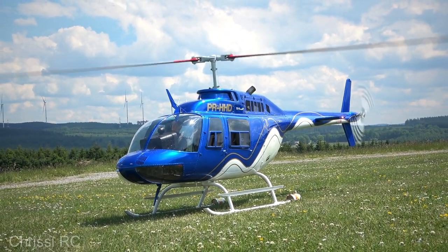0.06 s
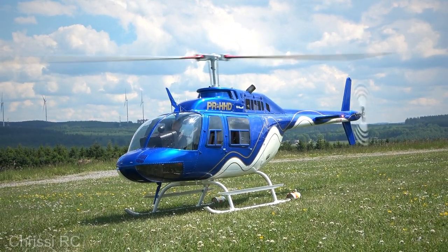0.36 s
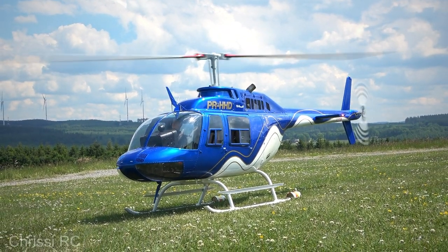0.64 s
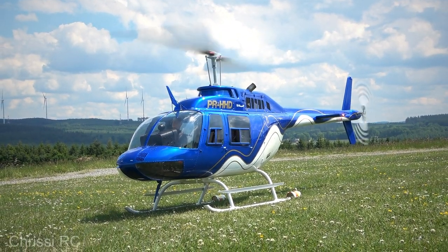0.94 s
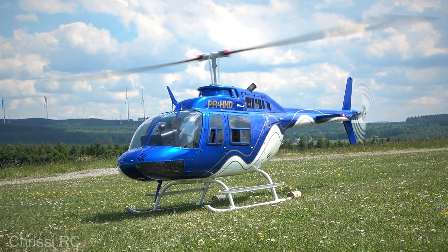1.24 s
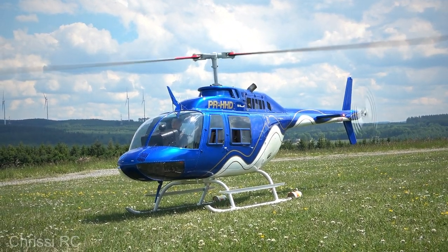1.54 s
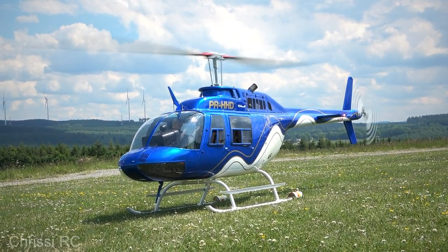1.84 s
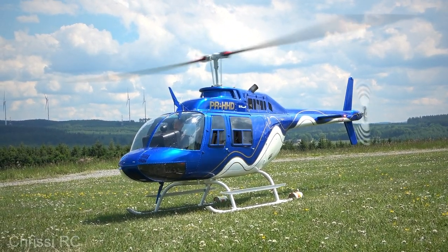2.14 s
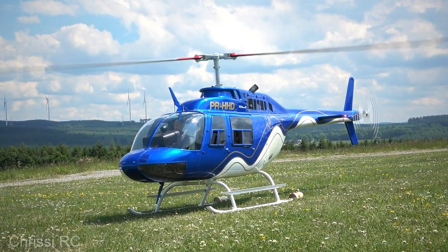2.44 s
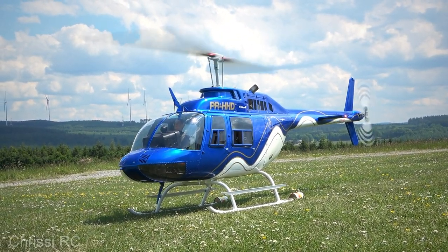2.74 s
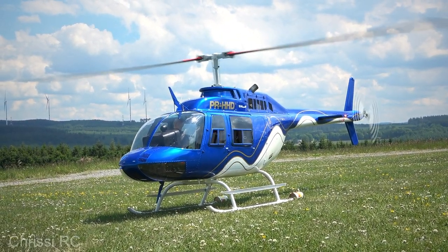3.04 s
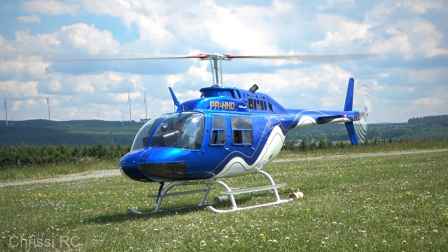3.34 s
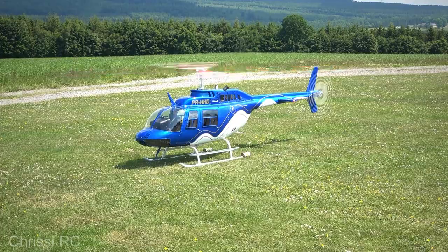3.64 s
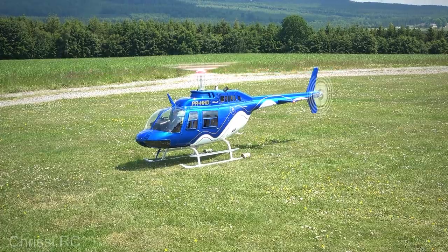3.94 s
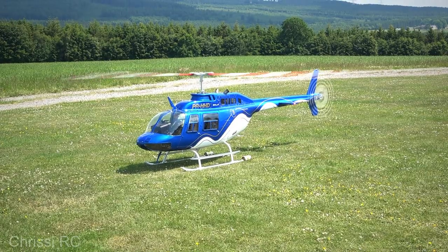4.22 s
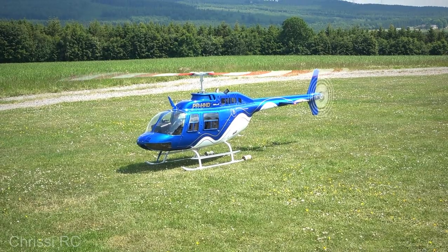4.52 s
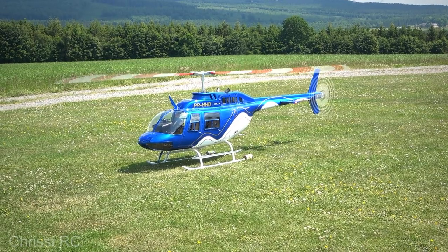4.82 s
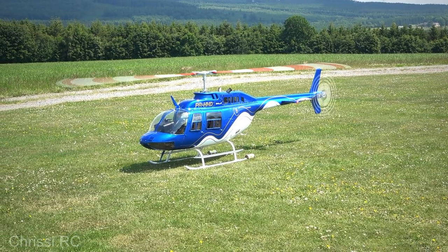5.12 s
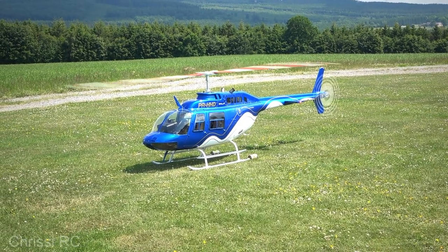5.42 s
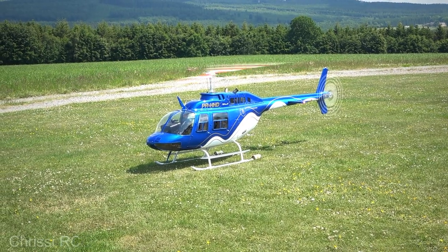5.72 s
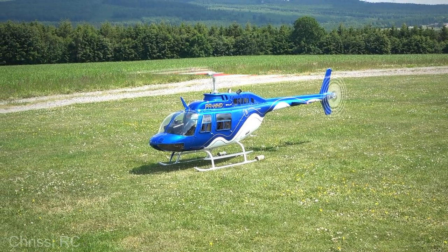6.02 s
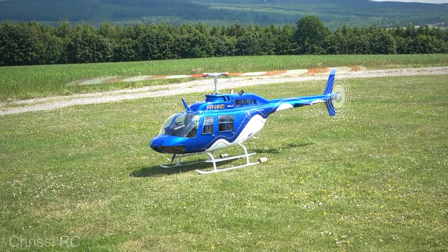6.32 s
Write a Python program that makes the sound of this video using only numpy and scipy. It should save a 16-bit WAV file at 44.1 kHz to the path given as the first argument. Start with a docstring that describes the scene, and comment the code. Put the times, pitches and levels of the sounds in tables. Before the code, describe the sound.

From the start, a model helicopter's turbine runs close to the microphone on open grass. A piercing, very high whine climbs slowly over a steady jet roar and hiss. Thinner whistles swell and fade beside it, with a low fuselage drone and faint gear tones underneath. The rotor adds only a barely noticeable pulse.

At about 3.6 seconds the sound switches abruptly to a position farther off, with the turbine running slower. A hollow, wavering, mid-pitched exhaust howl now leads over the rush, surging slightly around 3.7, 4.9 and 6 seconds. The whine is lower and much weaker, coming and going as it keeps rising gently until the end, at about 6.4 seconds.

Light wind rumbles on the microphone throughout, with soft gusts in the first second and again from about 4.8 seconds.

```python
"""A piercing compressor whine, close to the microphone: a model turbine helicopter spools up on open grass.
Under the whine lie the jet's combustion roar and hiss, a fuselage drone and faint gear tones.
After about 3.6 s we stand abruptly farther off, the turbine at a lower speed, and the resonating
exhaust pipe howls near 900 Hz. Wind nudges the microphone in both positions. Mono."""
import sys
import numpy as np
from scipy import signal
from scipy.fft import rfft, irfft, next_fast_len
from scipy.io import wavfile
from scipy.ndimage import uniform_filter1d

SR = 44100
rng = np.random.default_rng(int(sys.argv[2]) if len(sys.argv) > 2 else 0)


def wav_out(sig):
    """Save sig, one row per channel (or a flat mono array), as 16-bit PCM at SR to the path in sys.argv[1]."""
    wavfile.write(sys.argv[1], SR, np.round(np.clip(np.atleast_2d(sig).T, -1, 1) * 32767).astype(np.int16))


N = 280917
TIME = np.arange(N) / SR
FAR_START_S = 3.576
# cycles per turn of the turbine shaft
COMPRESSOR_ORDER, GEAR_RATIO, TAIL_RATIO, ROTOR_RATIO = 12, 0.1955, 0.0798, 0.01395

# compressor whine at each position: (time [s], pitch [Hz])
NEAR_WHINE_PITCH = [(0.0, 11979), (0.15, 12007), (0.5, 12108), (1.0, 12214), (1.5, 12309), (2.0, 12405),
                    (2.5, 12488), (3.0, 12569), (3.57, 12684)]
FAR_WHINE_PITCH = [(3.58, 8475), (4.0, 8543), (4.5, 8639), (5.0, 8734), (5.5, 8835), (6.0, 8944),
                   (6.37, 9034)]
# compressor whine at the microphone: (time [s], level [dB])
NEAR_WHINE_LEVEL = [(0.0, -20), (0.17, -18), (0.68, -22.6), (0.86, -19.5), (1.15, -19.8), (1.65, -17),
                    (2.66, -17), (2.82, -21.3), (3.57, -23)]
FAR_WHINE_LEVEL = [(3.58, -33), (3.85, -29), (4.0, -37), (4.32, -29), (4.58, -30), (5.08, -43), (5.24, -32),
                   (6.0, -36), (6.37, -35)]
# close whistles at 6 and 14 times the shaft rate: (time [s], level [dB])
WHISTLE_6_LEVEL = [(0.0, -30.5), (0.15, -35), (0.36, -43), (0.56, -28.3), (0.88, -30), (1.2, -34.5),
                   (1.9, -37), (3.0, -30.6), (3.57, -42)]
WHISTLE_14_LEVEL = [(0.0, -49), (0.37, -35.8), (0.53, -44), (1.02, -33.5), (1.28, -50), (1.9, -57)]
# surges of the exhaust howl: (start [s], hold [s], lift [dB])
HOWL_SURGES = [(3.71, 0.16, 2.5), (4.854, 0.071, 3), (6.02, 0.04, 1.5)]
# combustion roar: (frequency [Hz], relative density [dB])
NEAR_ROAR_SPECTRUM = [(55, -17), (88, -5.5), (125, -4.5), (220, -7), (280, -4.5), (350, -6.5), (620, -2),
                      (740, -4.5), (820, 1), (1080, -2), (1330, 0), (1450, -2.5), (1680, -1.5), (2750, -10)]
FAR_ROAR_SPECTRUM = [(65, -16), (115, -6.5), (160, -2), (220, -9.5), (350, -7.5), (470, -7), (600, -3.5),
                     (800, 8), (1130, 6), (1380, 2), (1620, -5.5), (2000, 0), (2300, -1), (2850, -10.5)]
# jet hiss: (frequency [Hz], relative density [dB])
NEAR_HISS_SPECTRUM = [(2850, -8.5), (3400, -4), (4000, -2.5), (4400, -7.5), (5200, -4), (6200, -4),
                      (7400, -8), (8800, 0), (9650, -9.5), (10700, -14), (12100, -3.5), (12900, -2.5),
                      (14400, -16.5), (15700, -14)]
FAR_HISS_SPECTRUM = [(2700, -9), (3050, -1.5), (3600, -0.5), (4350, -6.5), (5000, -1), (6300, -5.5),
                     (6900, -9), (8600, -3.5), (9400, -9), (10700, -12.5), (12500, -8.5), (14400, -9),
                     (15700, -14)]
# strength of the jet close up: (time [s], lift [dB])
NEAR_JET_LIFT = [(0.0, 0), (1.3, 1), (1.75, -0.5), (2.9, -1.4), (3.57, 0.5)]
# turbine shaft tones: (multiple of its rate, level [dB])
NEAR_SHAFT_TONES = [(2, -39), (9, -55), (10, -48), (11, -54)]
FAR_SHAFT_TONES = [(6, -58.5), (8, -65), (10, -52)]
# reduction gear tones: (multiple of its rate, level [dB])
NEAR_GEAR_TONES = [(2, -46.5), (8, -41.5), (15, -48), (16, -56), (19, -49), (20, -50.5)]
FAR_GEAR_TONES = [(2, -42), (4, -45.5), (18, -43.5), (20, -48.5), (22, -52.5), (26, -49), (30, -54),
                  (40, -52)]
# tail drive tones: (multiple of its rate, level [dB])
NEAR_TAIL_TONES = [(2, -46), (7, -40), (21, -40.5), (22, -42)]
# wind on the microphone: (frequency [Hz], relative density [dB])
WIND_SPECTRUM = [(8, -4), (14, 5), (22, -5), (32, -5.5), (48, -17), (80, -18), (200, -45)]
# gusts on the microphone: (start [s], hold [s], level [dB])
WIND_GUSTS = [(0.18, 0.12, -38), (0.547, 0.55, -38), (3.72, 0.091, -40), (4.8, 0.6, -34.5),
              (5.49, 0.06, -29), (5.88, 0.38, -34)]


def near_helicopter():
    """Microphone beside the machine: the whine stands out of the jet noise; the hollow fuselage drones."""
    shaft = shaft_angle(NEAR_WHINE_PITCH, hunting=0.00033)
    jet_db, = curves(NEAR_JET_LIFT)
    roar = from_db(-20 + jet_db + 0.35 * drift(6.7)) * coloured_noise(NEAR_ROAR_SPECTRUM)
    hiss = from_db(-24 + 0.71 * jet_db) * coloured_noise(NEAR_HISS_SPECTRUM)
    fuselage = from_db(-36) * cavity_noise(centre_hz=178.6, width_hz=40, lumpiness=0.25)
    compressor = whine(COMPRESSOR_ORDER * shaft, NEAR_WHINE_LEVEL,
                       flutter_db=0.72, fading_db=0.5, scatter=0.065, scatter_hz=110)
    whistles = whine(6 * shaft, WHISTLE_6_LEVEL,
                     flutter_db=2.5, fading_db=0.4, scatter=0.14, scatter_hz=60)
    whistles += whine(14 * shaft, WHISTLE_14_LEVEL,
                      flutter_db=1.6, fading_db=0.6, scatter=0.15, scatter_hz=60)
    drive = drive_tones(shaft, NEAR_SHAFT_TONES, waver_db=0.5)
    drive += drive_tones(GEAR_RATIO * shaft, NEAR_GEAR_TONES, waver_db=5.0)
    drive += drive_tones(TAIL_RATIO * shaft, NEAR_TAIL_TONES, waver_db=-2.5)
    return rotor_chop(shaft, depth_db=0.4) * (roar + hiss + compressor + whistles) + fuselage + drive


def far_helicopter():
    """Microphone farther off, turbine slower: the exhaust howl leads, and the whine comes and goes."""
    shaft = shaft_angle(FAR_WHINE_PITCH, hunting=0.0001)
    roar = from_db(-20) * coloured_noise(FAR_ROAR_SPECTRUM)
    hiss = from_db(-28) * coloured_noise(FAR_HISS_SPECTRUM)
    compressor = whine(COMPRESSOR_ORDER * shaft, FAR_WHINE_LEVEL,
                       flutter_db=0.9, fading_db=1.8, scatter=0.22, scatter_hz=110)
    drive = drive_tones(shaft, FAR_SHAFT_TONES, waver_db=4.0)
    drive += drive_tones(GEAR_RATIO * shaft, FAR_GEAR_TONES, waver_db=-0.5)
    return rotor_chop(shaft, depth_db=0.2) * (roar + hiss + compressor) + drive + exhaust_howl()


def shaft_angle(whine_pitch, hunting):
    """Angle of the turbine shaft in radians; its speed hunts very slightly."""
    whine_hz, = curves(whine_pitch)
    shaft_hz = whine_hz / COMPRESSOR_ORDER * (1 + hunting * drift(8.8))
    return 2 * np.pi * np.cumsum(shaft_hz) / SR


def whine(angle, level, flutter_db, fading_db, scatter, scatter_hz):
    """A blade tone crossing turbulent air flutters fast, fades slowly and gains a skirt of noise."""
    level_db, = curves(level)
    tone = np.sin(angle) * (1 + scatter * drift(scatter_hz))
    tone += np.cos(angle) * scatter * drift(scatter_hz)
    return from_db(level_db + flutter_db * drift(32) + fading_db * drift(7.9)) * unit_rms(tone)


def exhaust_howl(start_hz=871, rise_hz_per_s=15):
    """The exhaust pipe's resonance rises a little as the gas heats up and surges now and then."""
    centre_hz = start_hz + rise_hz_per_s * (TIME - FAR_START_S)
    surge_db = sum(lift_db * envelope(start, hold, attack_s=0.023, release_s=0.025)
                   for start, hold, lift_db in HOWL_SURGES)
    return from_db(-18 + surge_db) * cavity_noise(centre_hz, width_hz=174, lumpiness=0.51)


def cavity_noise(centre_hz, width_hz, lumpiness):
    """Combustion noise rings in a cavity: a narrow band that swells at random; rms 1."""
    lowpass = signal.butter(2, width_hz / 2, fs=SR, output="sos")
    swell = signal.sosfilt(lowpass, rng.standard_normal(N) + 1j * rng.standard_normal(N))
    # the flame feeds the cavity steadily, so the level evens out over longer spans
    local_power = uniform_filter1d(np.abs(swell) ** 2, SR // 8)
    swell /= local_power ** ((1 - lumpiness) / 2)
    angle = 2 * np.pi * np.cumsum(centre_hz * np.ones(N)) / SR
    return unit_rms(np.real(swell * np.exp(1j * angle)))


def drive_tones(angle, tones, waver_db):
    """A turning shaft or gear sings wavering tones at whole multiples of its rate."""
    return sum(np.sqrt(2) * from_db(level_db + waver_db * drift(6.3)) * np.sin(multiple * angle)
               for multiple, level_db in tones)


def rotor_chop(shaft, depth_db):
    """The two main blades chop the sound twice a turn, one harder than the other."""
    rotor = ROTOR_RATIO * shaft
    return from_db(depth_db * (np.sin(2 * rotor) + np.sin(rotor + np.pi / 4)))


def wind(breeze_db=-44.5, waver_db=1.5):
    """Air rumbles on the microphone: a light breeze with gusts on top."""
    gust_power = sum((from_db(level_db) * envelope(start, hold, attack_s=0.037, release_s=0.06)) ** 2
                     for start, hold, level_db in WIND_GUSTS)
    strength = np.sqrt(from_db(breeze_db) ** 2 + gust_power)
    return strength * from_db(waver_db * drift(6)) * coloured_noise(WIND_SPECTRUM)


def coloured_noise(spectrum):
    """Noise with the given spectrum, falling 48 dB an octave beyond its ends; rms 1."""
    size = next_fast_len(N)
    octave = np.log2(np.maximum(np.arange(size // 2 + 1) * SR / size, 1))
    hz, level_db = np.transpose(spectrum)
    octaves_outside = np.abs(octave - np.clip(octave, np.log2(hz[0]), np.log2(hz[-1])))
    gain = from_db(np.interp(octave, np.log2(hz), level_db) - 48 * octaves_outside)
    return unit_rms(irfft(rfft(rng.standard_normal(size)) * gain, size)[:N])


def drift(corner_hz):
    """Slow random wander: noise through two one-pole low-passes; rms about 1."""
    step, settling = 8, 8000   # one value every 8 samples; values dropped while the filter settles
    pole = np.exp(-2 * np.pi * corner_hz * step / SR)
    noise = rng.standard_normal(N // step + settling + 2)
    slow = signal.lfilter([1], [1, -2 * pole, pole * pole], noise)[settling:]
    return np.interp(np.arange(N) / step, np.arange(len(slow)), unit_rms(slow))


def envelope(start, hold, attack_s, release_s):
    """Rises to 1 and dies away from `hold` seconds after the start."""
    rise = np.clip((TIME - start) / attack_s, 0, 1)
    return rise * np.exp(-np.maximum(TIME - start - hold, 0) / release_s)


def curves(rows):
    """A timed table's value columns at every sample."""
    times, *columns = np.transpose(rows)
    return [np.interp(TIME, times, column) for column in columns]


def from_db(db):
    """Decibels to gain."""
    return 10 ** (np.asarray(db) / 20)


def unit_rms(x):
    """Scale to unit power."""
    return x / np.sqrt(np.mean(x ** 2) + 1e-20)


def scene():
    """The close position gives way at once to the far one; both channels carry the same sound."""
    mono = np.where(TIME < FAR_START_S, near_helicopter(), far_helicopter()) + wind()
    return np.array([mono, mono])


def record(dry, cutoff_hz=15750):
    """A steep low-pass takes off the highest treble."""
    return signal.sosfilt(signal.ellip(12, 0.1, 80, cutoff_hz, fs=SR, output="sos"), dry)


dry = scene()
out = record(dry)
wav_out(out)
```